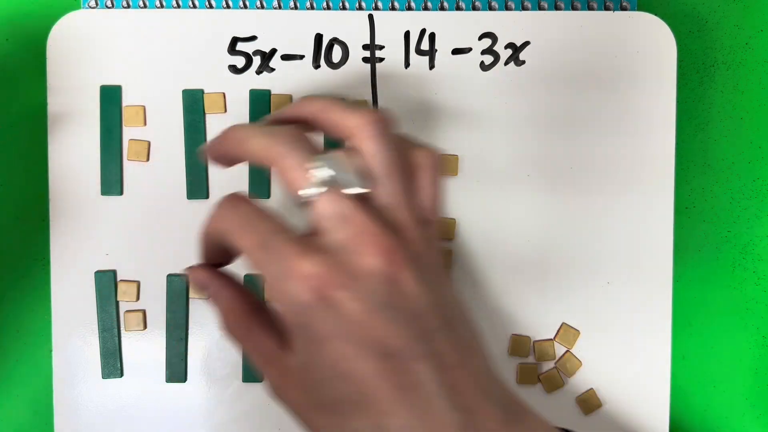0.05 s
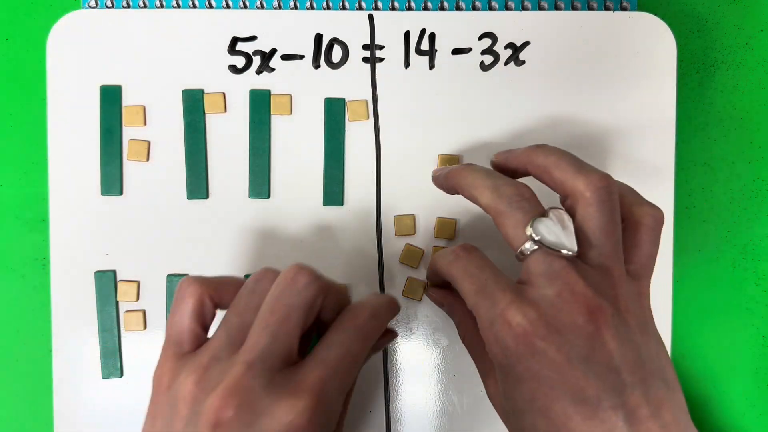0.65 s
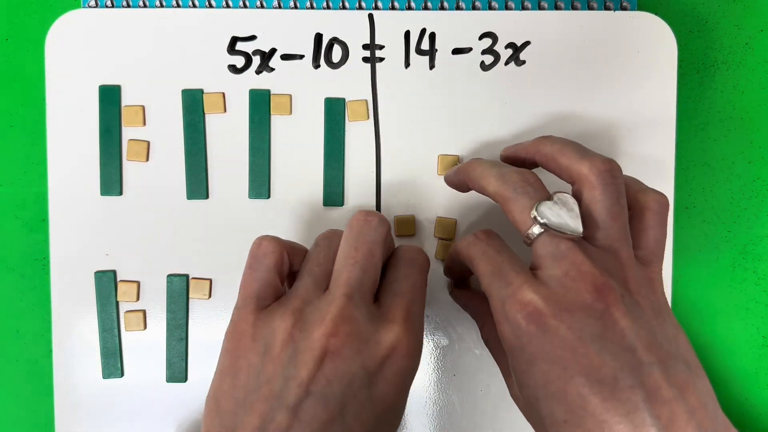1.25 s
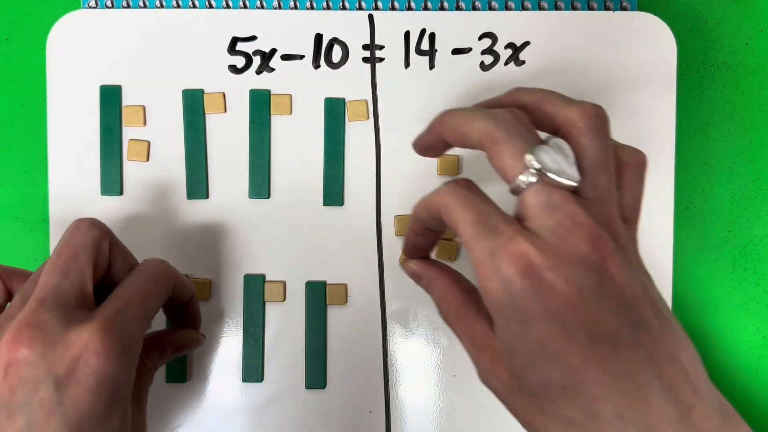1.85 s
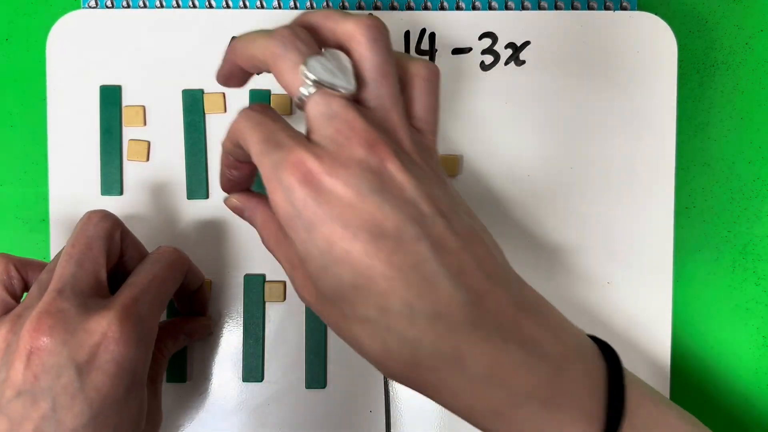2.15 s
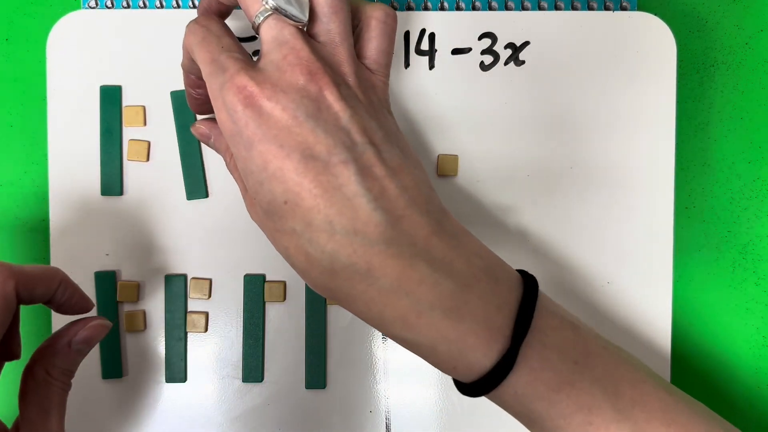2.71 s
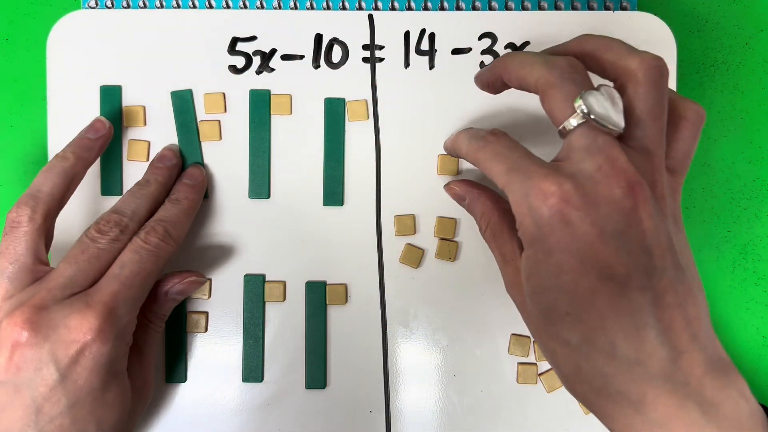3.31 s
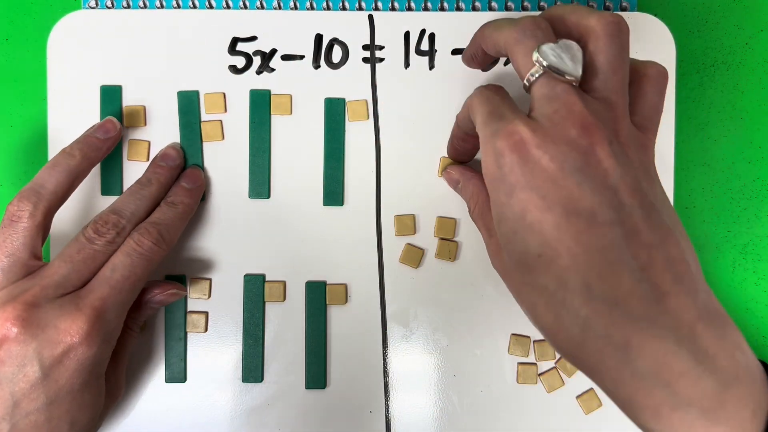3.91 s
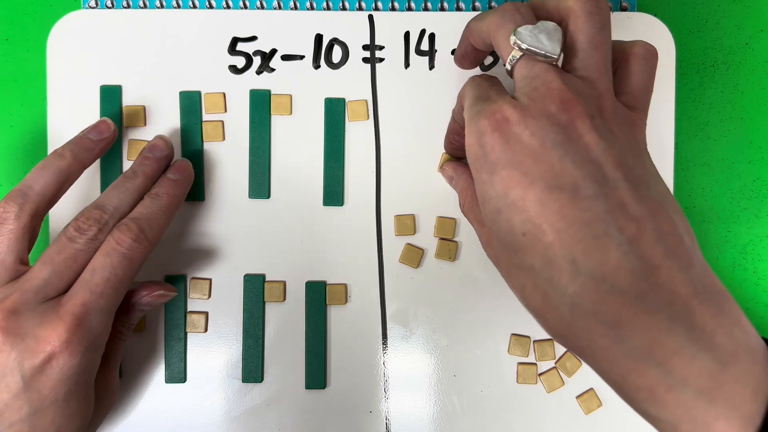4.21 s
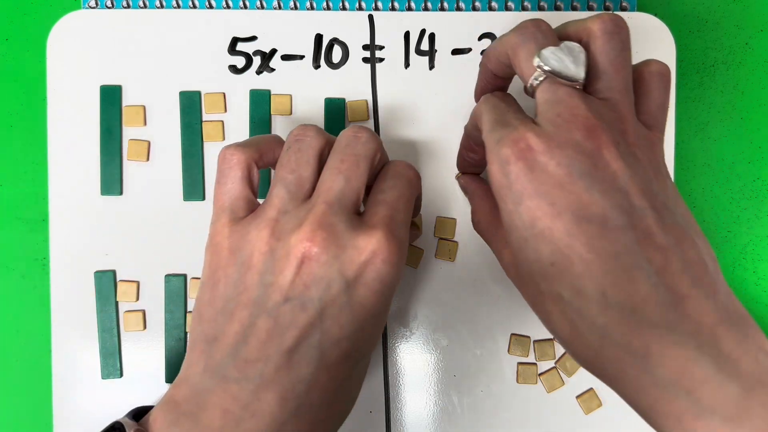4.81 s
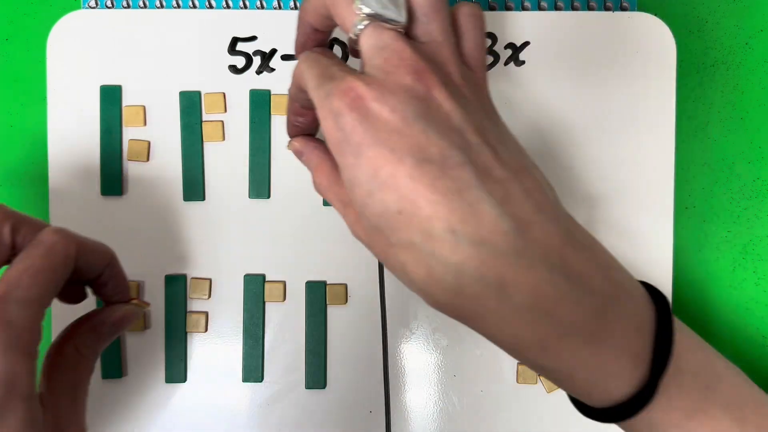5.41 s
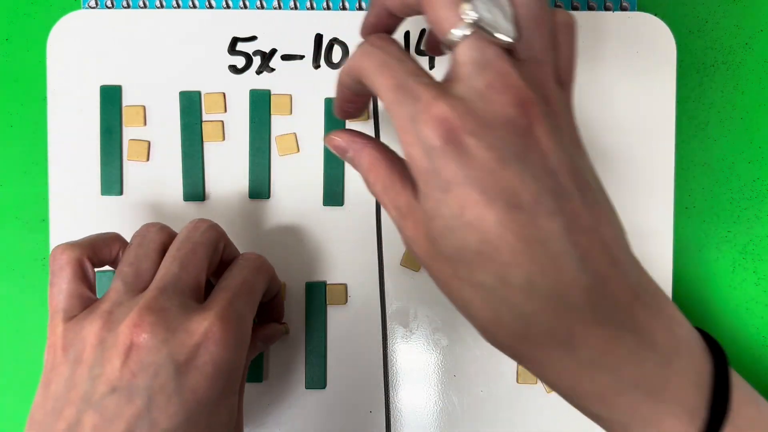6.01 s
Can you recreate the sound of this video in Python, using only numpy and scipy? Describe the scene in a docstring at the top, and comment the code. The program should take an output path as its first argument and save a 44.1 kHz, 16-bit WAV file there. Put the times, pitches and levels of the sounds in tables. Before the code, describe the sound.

A low ventilation hum with a soft rumble and faint hiss runs throughout. From about 0.5 seconds, fingers press and nudge small plastic tiles on a thin whiteboard lying on a table, giving quiet hollow thumps, light knocks and brief scuffs, bunching into a quick cluster around 1.3 seconds. Between 2 and 2.7 seconds, tile edges drop onto the board with a few separate, crisper clicks. At 3.4 seconds a firmer press knocks the board, followed by faint sliding. More muffled taps come from 4 to 4.7 seconds, with a dull double thud near 4.2 as the board rocks against the table. Tiles skid briefly around 4.9 and 5.2 seconds, then click lightly near 5.6 and 6. The sharpest, brightest snap lands just after 6.1 seconds. The touches sound close and lean slightly left, with the short echo of a small room.

```python
"""A low ventilation hum comes first and never stops. Half a second in, fingers begin to press,
nudge and set down small plastic tiles on a thin whiteboard lying on a table. Each touch makes the
board bend and ring: a low thump and a higher knock. A hard edge also makes the tile clack and snap,
while a soft fingertip muffles it. Pushed tiles scuff, the board now and then rocks against the
table with a dull thud, and a small room answers with a short echo."""
import sys
import numpy as np
from scipy import signal
from scipy.fft import rfft, irfft, next_fast_len
from scipy.io import wavfile
from scipy.ndimage import map_coordinates

SR = 44100
rng = np.random.default_rng(int(sys.argv[2]) if len(sys.argv) > 2 else 0)


def transcribe(u):
    """Save the signal u as a 16-bit wav file named by the first command-line argument.

    u: samples, shape (n,) or (channels, n), limited to [-1, 1]; the rate is SR.
    q: integer samples, one column per channel.
    """
    v = np.clip(np.atleast_2d(u).T, -1, 1)
    q = np.round(v * 32767).astype(np.int16)
    wavfile.write(sys.argv[1], SR, q)


N = 271259
RING_TIME = np.arange(SR // 10) / SR  # the 0.1 s for which one contact rings

# A fingertip presses a tile down: t/s, thump level/dB, knock over thump/dB,
# cushioning (clack under thump)/dB, snap over clack/dB, thump f/Hz, knock f/Hz
PRESSES = [(0.5103, -53.5, -9.5, 25, -12, 357, 750), (0.6732, -54, -9.5, 23, -12, 380, 710),
           (0.781, -60, -10, 32, -14, 363, 780), (0.8515, -65.5, -7, 11, -2, 362, 800),
           (0.8702, -55.5, -9, 35, -12, 380, 1100), (0.949, -54, -11, 29, 0, 338, 1150),
           (1.2473, -54, -12, 12, -29, 352, 1210), (1.2602, -57.5, -5, 15, -27, 350, 1150),
           (1.2722, -61, -7, 10, -21, 354, 1000), (1.2767, -61, -1, 11, -20, 353, 1150),
           (1.2885, -46.5, -16.5, 22, -16, 385, 560), (1.3043, -46.5, -4.5, 4, -13, 397, 1000),
           (1.3193, -50, -5.5, 6.5, -19, 397, 1220), (1.417, -66.5, -2, 13, -18, 352, 1500),
           (3.433, -42.5, -8, 16.5, -25, 308, 1190), (4.043, -56.5, -10, 13.5, -19, 277, 700),
           (4.106, -51.5, -16.5, 37, -14, 343, 770), (4.158, -52.5, -16, 29, -16, 280, 700),
           (4.2065, -54, -1, 4, -15, 282, 1760), (4.2084, -43.5, -5, 22.5, -4.5, 302, 685),
           (4.5536, -56, -10.5, 18, -16, 338, 696), (4.5674, -48, -15, 37, -16, 320, 696),
           (4.7365, -46.5, -15, 28.5, -16, 347, 770)]
# A tile's edge drops on the board: t/s, clack level/dB, clack f/Hz, knock over clack/dB, knock f/Hz,
# thump over knock/dB, snap over clack/dB, lean to the left/dB
CLICKS = [(0.9885, -71.5, 3020, 8, 1130, -1, 1, 4), (0.9962, -69.5, 2500, -3, 1250, -7, 1, 1),
          (1.3206, -64.5, 4420, -12, 1250, -5, -15, 3), (1.9667, -51.5, 2300, -4, 1880, -9, -9.5, 6),
          (2.1511, -73, 4340, 4, 1040, 0, -3.5, 10), (2.3797, -56.5, 3440, -5, 1520, -3, -8.5, 3.5),
          (2.557, -79, 3000, 10.5, 1680, -6, -7, 6), (2.718, -64, 3460, 1.5, 1170, -13, 13.5, 5.5),
          (4.567, -84, 3000, 12, 1680, -5, 8, -3), (5.355, -79, 4000, 5, 1200, -10, -8, 4),
          (5.578, -55.5, 2520, -2, 1300, 2, -7, 2), (5.6734, -76.5, 5500, 6, 1100, 1, -14, 1),
          (5.6874, -68, 5800, 4, 1080, -1, -13, 7), (5.7, -61.5, 2330, 7, 1150, -6, 9.5, 3),
          (6.014, -58, 2660, 0.5, 1300, -11, -7, 6), (6.1337, -41.5, 2230, -10.5, 1930, 1, 11, 5.5)]
# An edge skids: t/s, chatter level/dB, chatter f/Hz, treble cut/(dB an octave),
# knock over chatter/dB, thump over chatter/dB
SKIDS = [(1.2878, -65, 2870, 2.5, -7, 1), (4.7169, -73.5, 6500, -2, -2, -13),
         (4.8936, -61.5, 2450, 1.5, -7, -1), (5.153, -62.5, 3260, -1, 1.5, 4.5)]
# A tile is pushed along: t/s, length/s, level/dB, scratch over thump/dB
SLIDES = [(0.516, 0.072, -60.5, -30), (0.683, 0.084, -66, -28), (0.852, 0.022, -63, -14),
          (0.952, 0.067, -56.5, -19.5), (1.252, 0.044, -57, -10), (2.127, 0.036, -63.5, -4.5),
          (3.445, 0.1, -70.5, -15), (3.655, 0.046, -68.5, -7), (4.225, 0.07, -63, -28),
          (4.554, 0.046, -59, -12.5)]
# The board gives under a firm press and rocks on the table: t/s, level/dB
BUMPS = [(3.436, -50), (4.237, -41.5), (4.2621, -49)]

# Modes are the tones a struck thing rings with; t60 is the time to fade by 60 dB: f/Hz, level/dB, t60/s
THUMP_MODES = [(175, -6.5, 0.043), (272, -1, 0.028), (345, -2.5, 0.045), (413.6, -9.5, 0.038)]  # the board's lowest bending tones
KNOCK_MODES = [(530, -9.5, 0.02), (684, -1.5, 0.028), (812, -5.5, 0.032), (1013, -0.5, 0.02),
               (1137, 7.5, 0.012), (1355, -9, 0.041), (1555, -9, 0.029), (1708, 2, 0.029),
               (1930, -5.5, 0.024), (2110, -3.5, 0.016)]  # the board's higher tones
EDGE_MODES = [(7110, 2, 0.02), (9190, -2.5, 0.0069), (9740, 6.5, 0.0083), (11700, -2, 0.013),
              (14950, -7, 0.014)]  # a stiff little tile, struck on its edge
# Spectra say how strong a noise is from low to high: f/Hz, relative level/dB
CLACK_SPECTRUM = [(500, -28), (1000, -10), (1400, -6), (2000, -11), (2900, -11), (3700, -9.5), (4300, -7),
                  (5200, -7.5), (6500, -4), (8000, -20), (12000, -26)]  # the tile's body
SNAP_SPECTRUM = [(5000, -19), (6900, -3), (7900, 0.5), (8700, 2.5), (9700, -4), (12000, 1), (15000, -7.5),
                 (17000, -14)]  # the tile's edge
SCATTER_SPECTRUM = [(1000, -21), (2500, -3.5), (4500, 0), (8000, -1.5), (10000, -10), (14000, -22)]  # what a tile sends out to the walls
RUMBLE_SPECTRUM = [(15, -37.5), (30, -18.5), (43, 2), (64, 2), (85, -2), (115, -4.5), (140, -3.5),
                   (185, -11.5), (260, -15), (350, -21.5), (480, -30), (900, -42.5), (2000, -55.5)]  # the ventilation's air
HISS_SPECTRUM = [(200, -23), (480, 0), (700, -4), (1000, -10), (1400, 3), (2200, 3), (2900, 1), (3800, -7),
                 (4450, -5), (5500, -11.5), (7000, -7), (9500, -22), (12800, -15.5), (14500, -5),
                 (15700, -7.5), (16300, -23)]  # the microphone's hiss
# Hum of the fan motor (first row) and its ducts: f/Hz, level/dB, wobble rate/Hz
HUM_TONES = [(119.5, -56.7, 0.57), (120.54, -58, 20), (157.2, -64, 12), (230.8, -77.5, 14), (352, -81, 18)]
# How alike the steady noise is on the left and right: f/Hz, likeness (1 = the same)
STEREO_LIKENESS = [(60, 0.99), (150, 0.8), (380, 0.69), (950, 0.19), (2400, 0.39), (6000, 0.049),
                   (15000, 0.23)]
# How long the room rings: f/Hz, t60/s
ROOM_DECAY = [(200, 0.18), (560, 0.66), (760, 0.55), (1000, 0.28), (4000, 0.22), (9000, 0.18),
              (16000, 0.021)]

THUMP_HZ, SNAP_HZ = 350, 8900  # the pitches that a bare edge brings out
CLACK_CORNER_HZ = 2870  # a soft contact dulls the clack above this


def presses(dulling_per_db=0.67):
    """The more the fingertip cushions a tile, the less it clacks and the duller the board knocks."""
    out = np.zeros((2, N))
    for start, thump_db, knock_db, cushion_db, snap_db, thump_hz, knock_hz in PRESSES:
        clack_db = thump_db - cushion_db
        press = contact(thump_db, thump_db + knock_db, clack_db, clack_db + snap_db,
                        thump_hz, knock_hz, clack_hz=2760, pan_db=2.5,
                        knock_slope=dulling_per_db * cushion_db, clack_slope=23.5, snap_slope=0)
        add(out, start, press)
    return out


def clicks(square_snap_db=3.5, dulling_per_db=0.57):
    """A dropped edge clacks and knocks; the squarer it lands, the stronger and brighter its snap."""
    out = np.zeros((2, N))
    for start, clack_db, clack_hz, knock_db, knock_hz, thump_db, snap_db, pan_db in CLICKS:
        snap_slope = dulling_per_db * (square_snap_db - snap_db)
        click = contact(clack_db + knock_db + thump_db, clack_db + knock_db, clack_db, clack_db + snap_db,
                        THUMP_HZ, knock_hz, clack_hz, pan_db,
                        knock_slope=1.8, clack_slope=4, snap_slope=snap_slope)
        add(out, start, click)
        wall_gain = np.hypot(amp(-14), amp(snap_db - 21.5))  # the clack's share and the snap's
        add(out, start, amp(clack_db) * wall_gain * wall_scatter())
    return out


def contact(thump_db, knock_db, clack_db, snap_db, thump_hz, knock_hz, clack_hz, pan_db,
            knock_slope, clack_slope, snap_slope):
    """One touch: the board thumps and knocks, the tile clacks, and its edge snaps and rings."""
    thump = amp(thump_db) * board_thump(thump_hz)
    knock_modes = dulled(KNOCK_MODES, knock_slope, corner_hz=710)
    knock = amp(knock_db) * ringing(knock_modes, knock_hz, spread=0.44, attack=0.00073, octaves=0.31)
    clack_spectrum = dulled(CLACK_SPECTRUM, clack_slope, CLACK_CORNER_HZ)
    clack = amp(clack_db) * tile_chatter(clack_spectrum, clack_hz, t60=0.014, attack=0.00072, width=0.8)
    snap_spectrum = dulled(SNAP_SPECTRUM, snap_slope, corner_hz=5040)
    edge_noise = tile_chatter(snap_spectrum, SNAP_HZ, t60=0.012, attack=0.0005, width=0.93)
    edge_modes = dulled(EDGE_MODES, snap_slope, corner_hz=5000)
    edge_ring = ringing(edge_modes, SNAP_HZ, spread=0.17, attack=0.00033, octaves=0.47)
    snap = amp(snap_db) * burst(edge_noise + amp(-9) * edge_ring)
    direct = panned(thump, pan_db=1.5) + panned(knock + clack, pan_db) + snap
    return in_room(direct, room_db=-19.5)


def board_thump(pitch_hz):
    """The hollow low ring of the board; the spot that is touched favours the tones near one pitch."""
    return ringing(THUMP_MODES, pitch_hz, spread=0.07, attack=0.0053, octaves=0.26)


def ringing(modes, pitch_hz, spread, attack, octaves, overtone_ratio=2.82):
    """A struck board or tile rings with fading tones, a little different on every hit."""
    hz, db, t60 = np.transpose(modes)[:, :, None]
    random_db, detune, phase, phase_gap = rng.standard_normal((4, len(modes), 1))
    angle = 2 * np.pi * (hz * (1 + 0.015 * detune) * RING_TIME + phase)
    # A spot that drives one pitch well also drives the tones overtone_ratio times higher.
    spot_db = sum(boost(hz, k * pitch_hz, peak_db=10, octaves=octaves) for k in (1, overtone_ratio))
    fade = amp(db + random_db + spot_db - 60 * RING_TIME / t60)
    rise = 1 - np.exp(-RING_TIME / attack)
    # Each tone reaches the left and right slightly out of step.
    channels = [(rise * fade * np.sin(angle + side * spread * phase_gap)).sum(0) for side in (1, -1)]
    return burst(np.array(channels))


def tile_chatter(spectrum, pitch_hz, t60, attack, width):
    """A tile rattles on the board for a few milliseconds, with so many tones that they blur to noise."""
    colour = lambda hz: amp(along(spectrum, hz) + boost(hz, pitch_hz, peak_db=9, octaves=0.3))
    mid, side = filtered(rng.standard_normal((2, len(RING_TIME))), colour)
    fade = amp(-60 * RING_TIME / t60)
    rise = 1 - np.exp(-(RING_TIME / attack) ** 2)
    return np.array([burst((mid + sign * width * side) * rise * fade) for sign in (1, -1)])


def skids():
    """A skidding edge chatters a little longer than a click and only brushes the board."""
    out = np.zeros((2, N))
    knock_modes = dulled(KNOCK_MODES, slope=7.5, corner_hz=500)
    for start, db, pitch_hz, slope, knock_db, thump_db in SKIDS:
        spectrum = dulled(CLACK_SPECTRUM, slope, CLACK_CORNER_HZ)
        chatter = tile_chatter(spectrum, pitch_hz, t60=0.023, attack=0.0016, width=0.67)
        knock = amp(knock_db) * ringing(knock_modes, 536, spread=0.89, attack=0.0012, octaves=0.087)
        thump = amp(thump_db) * board_thump(THUMP_HZ)
        add(out, start, in_room(amp(db) * (chatter + knock + thump), room_db=-6))
        add(out, start, amp(db - 10) * wall_scatter())
    return panned(out, pan_db=3)


def slides(slips_per_second=900):
    """A pushed tile catches and slips many times, each slip a tiny blow on the board."""
    out = np.zeros((2, N))
    t = np.arange(SR // 4) / SR
    knock_modes = dulled(KNOCK_MODES, slope=40, corner_hz=1055)
    scratch_spectrum = dulled(CLACK_SPECTRUM, slope=14, corner_hz=1730)
    for start, length, db, scratch_db in SLIDES:
        stroke = np.sqrt(np.abs(np.sin(np.pi * np.minimum(t / length, 1))))
        slipping = rng.random(len(t)) < slips_per_second / SR
        slips = unit(slipping * rng.standard_normal(len(t))) * stroke
        thump = board_thump(pitch_hz=370)
        knock = ringing(knock_modes, pitch_hz=700, spread=0.38, attack=0.00075, octaves=0.23)
        scratch = tile_chatter(scratch_spectrum, pitch_hz=2300, t60=0.015, attack=0.00026, width=0.54)
        blow = thump + amp(-9.5) * knock + amp(scratch_db) * scratch
        scuff = amp(db) * signal.fftconvolve(slips[None], blow / np.linalg.norm(blow[0]), axes=1)
        add(out, start, in_room(scuff, room_db=-16))
    return panned(out, pan_db=2)


def bumps(pitch_hz=130, t60=0.036, attack=0.0026):
    """The whole board rocks against the table: a dull thud of a swing or two."""
    out = np.zeros((2, N))
    fade = amp(-60 * RING_TIME / t60)
    rise = 1 - np.exp(-RING_TIME / attack)
    thud = burst(np.sin(2 * np.pi * pitch_hz * RING_TIME) * rise * fade)
    for start, db in BUMPS:
        add(out, start, panned(amp(db) * thud, pan_db=1.5))
    return out


def in_room(x, room_db, wall_delay=0.0102, wall_db=-19):
    """The sound arrives directly, bounces off one near wall and lingers in the room."""
    echoes = amp(room_db) * room_tail()
    echoes[:, 0] += 1  # the direct sound
    echoes[:, round(wall_delay * SR)] += amp(wall_db)
    return signal.fftconvolve(x, echoes, axes=1)


def wall_scatter():
    """A tile's sound comes back from the walls as an even, bright wash."""
    return burst(filtered(room_tail(), lambda hz: amp(along(SCATTER_SPECTRUM, hz))))


def room_tail(attack=0.0056):
    """Countless echoes blur into noise, in which each frequency dies away at its own speed."""
    hz, t, noise = signal.stft(rng.standard_normal((2, SR // 3)), SR, nperseg=256)
    fade = amp(-60 * t / along(ROOM_DECAY, hz)[:, None])
    rise = 1 - np.exp(-(t / attack) ** 2)
    tail = signal.istft(noise * rise * fade, SR, nperseg=256)[1]
    return tail / np.linalg.norm(tail[0])


def ventilation():
    """A fan motor hums and its ducts ring unevenly, over rumbling air and faint hiss."""
    t = np.arange(N) / SR
    (motor_hz, motor_db, drift_rate), *ducts = HUM_TONES
    hum = amp(motor_db) * unit(np.sin(2 * np.pi * motor_hz * t + 0.5 * wobble(drift_rate)))
    for hz, db, rate in ducts:
        angle = 2 * np.pi * hz * t
        hum += amp(db) * unit(wobble(rate) * np.sin(angle) + wobble(rate) * np.cos(angle))
    rumble = amp(-53) * steady_noise(RUMBLE_SPECTRUM)
    hiss = amp(-81.5) * steady_noise(HISS_SPECTRUM)
    return panned(hum, pan_db=3) + panned(rumble, pan_db=0.5) + panned(hiss, pan_db=7.5)


def steady_noise(spectrum):
    """Noise that is alike on both sides in the bass and mostly unrelated in the treble."""
    def colour(hz):
        side_angle = np.arccos(np.clip(along(STEREO_LIKENESS, hz), -1, 1)) / 2
        return amp(along(spectrum, hz)) * [np.cos(side_angle), np.sin(side_angle)]
    mid, side = filtered(rng.standard_normal((2, N)), colour)
    return unit(np.array([mid + side, mid - side]))


def boost(hz, pitch_hz, peak_db, octaves):
    """Extra dB for the tones near one pitch, which the touching spot or edge brings out."""
    return peak_db / (1 + (np.log2((hz + 1) / pitch_hz) / octaves) ** 2)


def dulled(rows, slope, corner_hz):
    """A longer, softer contact loses treble: slope dB for each octave above the corner."""
    return [(hz, db - slope * max(np.log2(hz / corner_hz), 0), *rest) for hz, db, *rest in rows]


def amp(db):
    """Turn decibels into a gain."""
    return 10 ** (np.asarray(db) / 20)


def unit(x):
    """Scale to an average (rms) level of 1."""
    return x / np.sqrt(np.mean(x ** 2) + 1e-20)


def burst(x):
    """Give a short sound the energy of 10 ms at level 1."""
    return unit(x) * np.sqrt(SR / 100 / x.shape[-1])


def along(points, hz):
    """Read between (frequency, value) points, with octaves evenly spaced."""
    point_hz, values = np.transpose(points)
    return np.interp(np.log(hz + 1), np.log(point_hz), values)


def filtered(x, response):
    """Turn each frequency of x up or down by the gain response(hz)."""
    length = x.shape[-1]
    padded = next_fast_len(length + 8192)
    gains = response(np.fft.rfftfreq(padded, 1 / SR))
    return irfft(rfft(x, padded) * gains, padded)[..., :length]


def wobble(rate):
    """A smooth curve through `rate` random values a second."""
    coarse = np.linspace(0, N, 4096)
    curve = map_coordinates(rng.standard_normal(size=1024), [coarse * rate / SR], mode="mirror")
    return np.interp(np.arange(N), coarse, curve)


def add(track, start, x):
    """Mix x into the track from start seconds on."""
    i = round(start * SR)
    track[:, i:i + x.shape[1]] += x[:, :max(N - i, 0)]


def panned(x, pan_db):
    """Lean a sound to the left by pan_db."""
    return x * amp([[pan_db / 2], [-pan_db / 2]])


def scene():
    """Tiles on the board, in the humming room."""
    return presses() + clicks() + skids() + slides() + bumps() + ventilation()


def record(dry, notch_hz=11300, notch_width_hz=800, notch_db=-23, top_hz=16400):
    """The microphone dips in one narrow treble band and cuts off steeply at the very top."""
    notch = lambda hz: amp(notch_db * np.exp(-((hz - notch_hz) / notch_width_hz) ** 2))
    return filtered(dry, lambda hz: notch(hz) / np.sqrt(1 + (hz / top_hz) ** 160))


dry = scene()
out = record(dry)
transcribe(out)
```